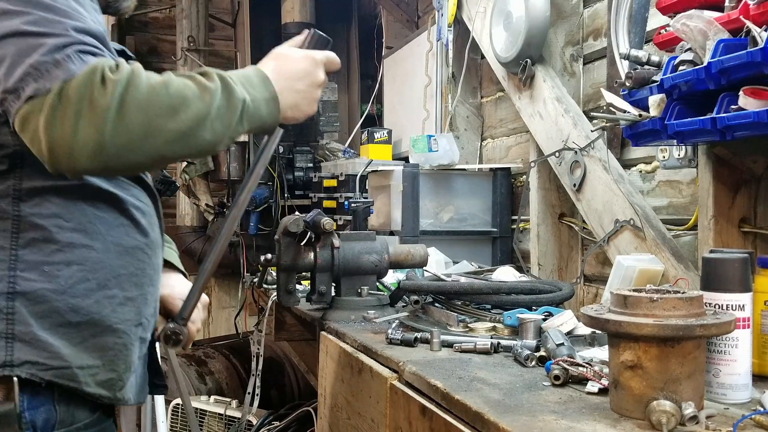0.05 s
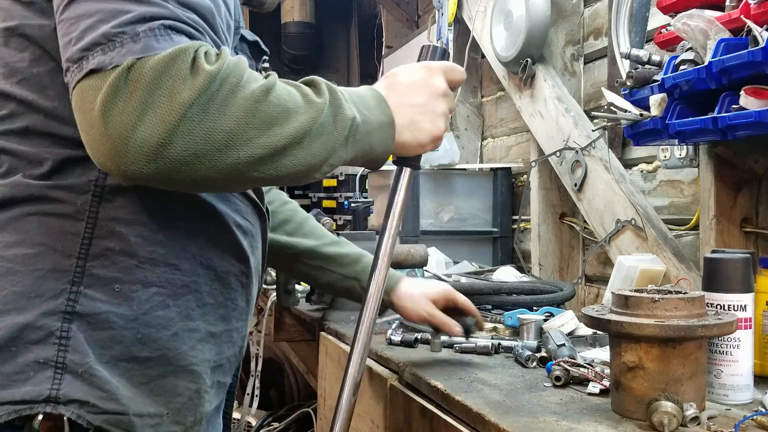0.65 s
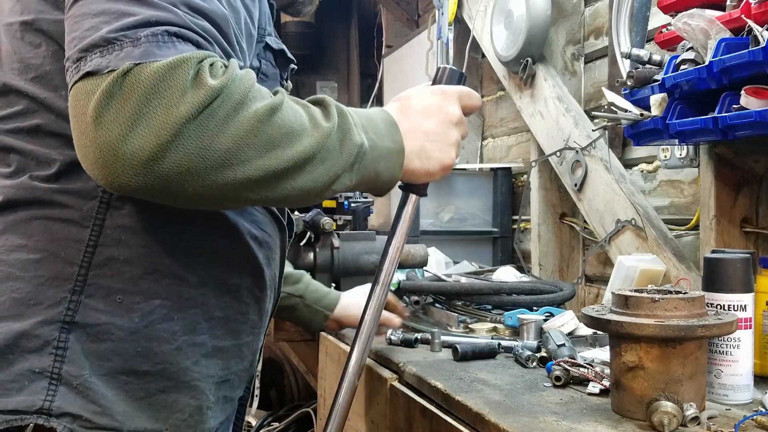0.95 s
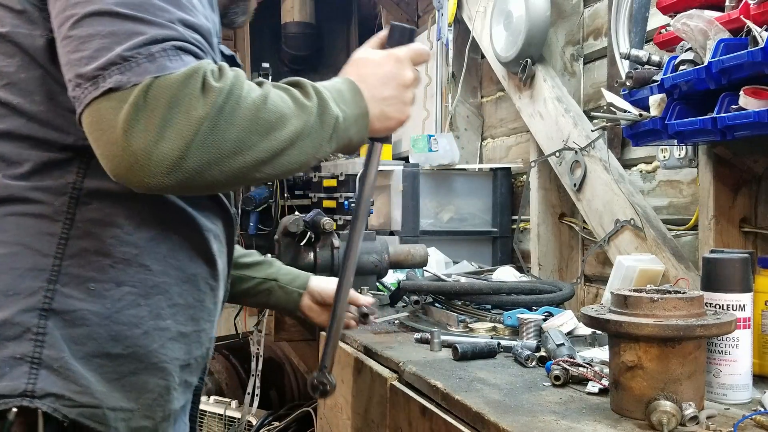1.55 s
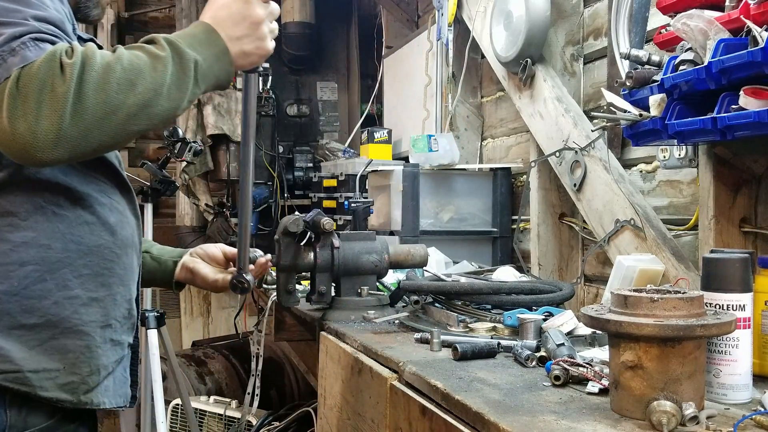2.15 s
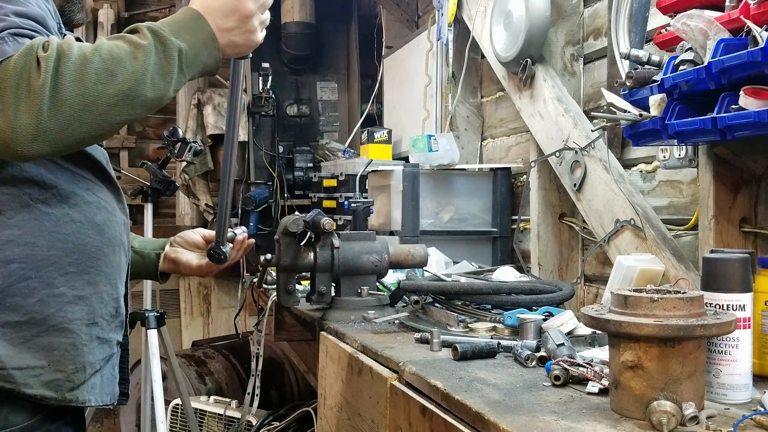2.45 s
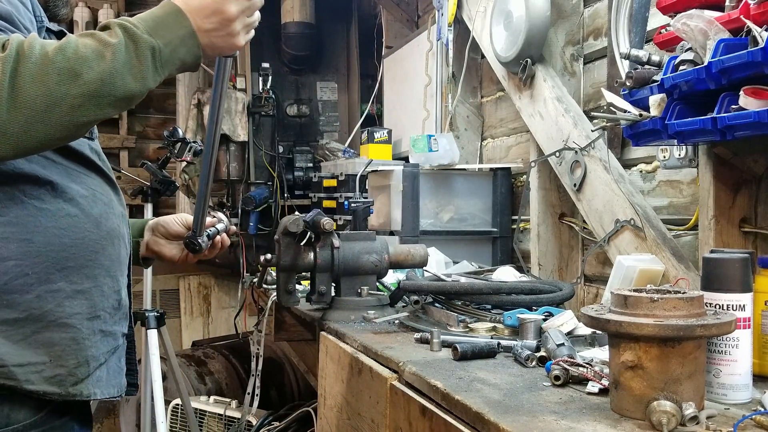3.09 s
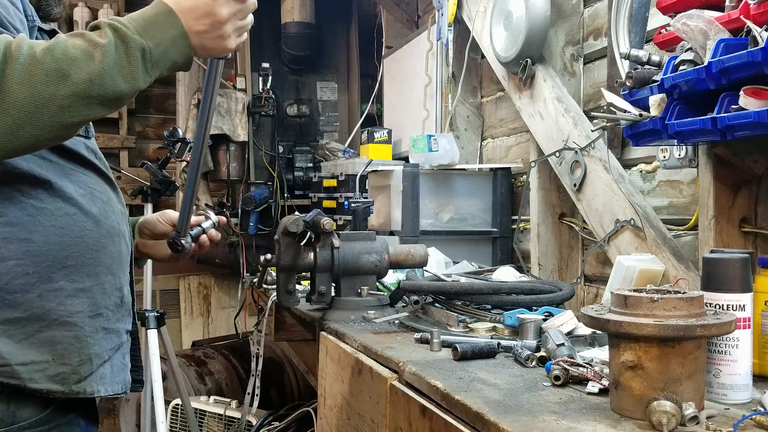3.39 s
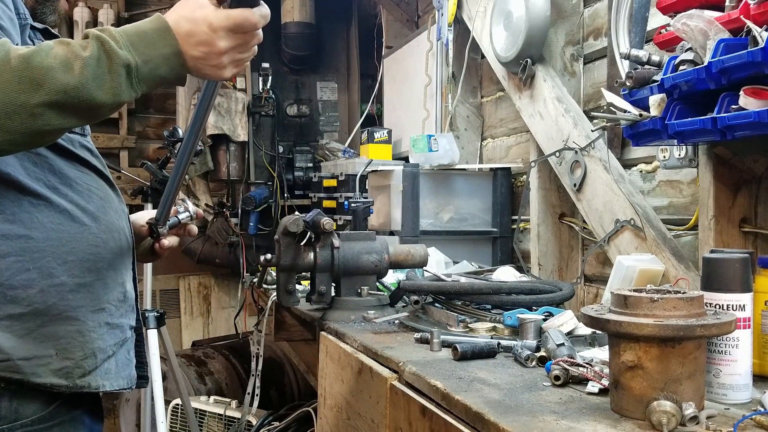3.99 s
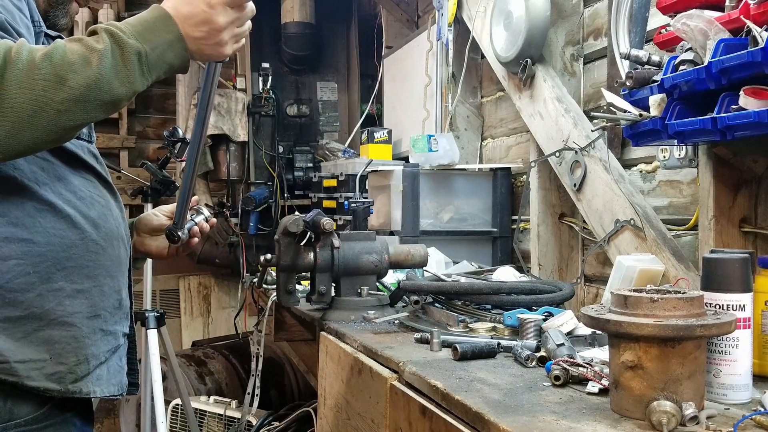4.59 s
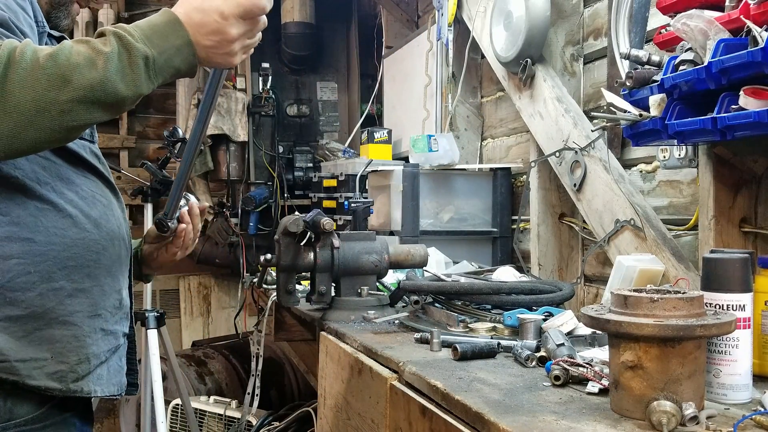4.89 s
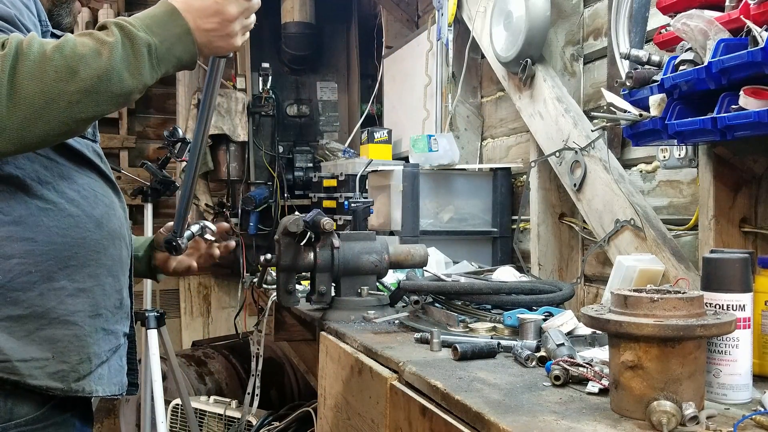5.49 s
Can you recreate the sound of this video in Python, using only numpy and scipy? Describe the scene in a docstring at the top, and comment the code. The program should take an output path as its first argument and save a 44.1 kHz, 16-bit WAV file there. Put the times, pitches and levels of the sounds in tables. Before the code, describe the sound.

A torque wrench gives a few small metallic clicks in the first quarter second, with a soft brush of sleeve. At about 0.8 seconds a heavy steel socket lands on a wooden workbench with a loud knock and rocks in a quick clatter, settling by about 1 second. Faint cloth rustle comes and goes. From 2.7 to 3.6 seconds another socket ticks and clinks lightly and irregularly against the wrench. At 4 seconds it snaps home with a sharp, loud metallic click, followed by a tiny tick. From about 5 to 5.3 seconds the ratchet is spun by hand in two quick twists, a rapid run of fine clicks with slight scraping and thin squeaks. Everything sounds close, with the short reverberation of a small workshop and a faint low hum that grows a little in the second half.

```python
"""Changing sockets on a torque wrench

In a small workshop a heavy socket lands and rocks on a wooden bench, driving bending waves in the boards.
Another ticks against the square drive and snaps home, each impact exciting the modes of the steel.
The ratchet clicks, then is spun by hand: its pawl strikes once per tooth, while friction scrapes and
squeals. A sleeve brushes past as soft noise, and a faint hum lies under the room's reverberation."""
import sys
import numpy as np
from scipy import signal
from scipy.fft import rfft, irfft
from scipy.io import wavfile
from scipy.ndimage import uniform_filter1d

SR = 44100
rng = np.random.default_rng(int(sys.argv[2]) if len(sys.argv) > 2 else 0)


def persist_wave(psi):
    """Save psi, clipped to +-1, as 16-bit WAV."""
    counts = np.round(np.clip(psi, -1, 1) * 32767).astype(np.int16)
    wavfile.write(sys.argv[1], SR, np.atleast_2d(counts).T)


N = 248846
TAPS = 4096
HZ = np.fft.rfftfreq(TAPS, 1 / SR)
TIME, AGE = np.arange(N) / SR, np.arange(SR) / SR  # seconds into the scene, and into one event

# Socket landing on the bench: start_s, level_db, high_hz, low_hz, lean_left_db, rebound_gap_s,
# change_per_rebound_db
BENCH_IMPACTS = [(.7893, 5, 13000, 520, -7.5, 0.0093, -2.5), (.7999, 12.1, 3100, 119, 0.5, .0045, -2),
                 (.842, 4, 1100, 60, -3.5, 0.01, -4), (.878, 2.5, 1400, 300, 5, .0208, -2),
                 (.9094, 5.5, 2600, 380, 6.5, .0076, -2.5)]
# Response of the boards to a blow: frequency_hz, gain_db
BENCH_SPECTRUM = [(40, -11), (90, 4.5), (150, 8), (300, -6), (450, 1), (800, 0.5), (1200, 3), (1800, -5.5),
                  (2300, -8.5), (2900, -18.5), (4500, -21), (8000, -41.5), (15000, -38)]
# Normal modes of the bench top: pitch_hz, level_db
BOARD_MODES = [(123.8, -44.5), (140.0, -45), (269.2, -46), (366.1, -44), (506.0, -32), (716.0, -42),
               (807.5, -54), (904.4, -50.5), (942.1, -49), (990.5, -41), (1034, -36), (1087, -35),
               (1168, -31), (1303, -55.5), (1373, -53), (1502, -50), (1626, -33), (1798, -33),
               (1900, -49.5), (2277, -59)]
# Socket touching steel: start_s, level_db, low_hz, high_hz, scrape_s, relative_ring_db
SOCKET_TOUCHES = [(.004, -22.5, 2500, 8800, .027, -14), (.9, -26, 2800, 4000, .001, 3),
                  (.9094, -23.5, 3000, 6500, .007, -3), (2.6632, -26, 1200, 4500, 0.0014, -14),
                  (2.8044, -26, 2800, 7500, .002, -2), (2.816, -14, 2940, 7600, 0.001, -2),
                  (2.8737, -25, 1400, 2100, 0.00085, -14), (3.1268, -18.5, 620, 6500, .0022, -26),
                  (3.308, -28, 1000, 3470, 0.0099, -18), (3.333, -27, 1200, 6500, 0.0045, -16),
                  (4.296, -32, 1800, 6940, 0.0069, -16)]
# Resonances of the socket, damped by the fingers: centre_hz, width_hz, gain_db
SOCKET_RESONANCES = [(3080, 860, 4.5), (4860, 620, 5), (6970, 1900, 2.5), (10400, 1200, 4)]
# Resonances of the wrench head: centre_hz, width_hz, gain_db
HEAD_RESONANCES = [(1950, 980, 5), (2710, 690, -4), (4680, 630, 4.5), (5900, 1600, 1.5), (9260, 490, -2.5),
                   (11400, 520, 5.5), (14200, 1200, 5)]
# Two twists of the fingers spinning the ratchet: time_s, speed_teeth_per_s, drop_level_db
RATCHET_MOTION = [(4.9957, 77, -14), (5.052, 78, -16.5), (5.085, 94, -16.5), (5.118, 87, -19),
                  (5.138, 55, -25), (5.192, 52, -25), (5.218, 77, -23), (5.243, 75, -16), (5.266, 76, -23),
                  (5.278, 26, -25), (5.305, 26, -20.5)]
# Lone clicks as the wrench is swung: start_s, level_db, low_hz, relative_ring_db, lift_level_db
SWING_CLICKS = [(.163, -19.5, 3500, -7.5, -20), (.2455, -17.5, 900, -22, -28)]
# Stick-slip of the gear in the head: middle_s, half_length_s, level_db, pitch_hz
GEAR_SQUEALS = [(5.097, .035, -58, 6140), (5.206, .03, -52, 6100), (5.262, .014, -40.5, 5950),
                (5.303, 0.0068, -46, 6050)]
# Sleeve brushing jacket and bench: middle_s, half_length_s, level_db
SLEEVE_STROKES = [(.12, 0.33, -55.5), (1.304, .07, -58.5), (1.518, 0.051, -54.5), (2.25, 0.081, -47.5),
                  (2.152, 0.4, -60), (3.401, 0.65, -62.5)]
# Friction noise of cloth: frequency_hz, relative_density_db
CLOTH_SPECTRUM = [(150, -7.5), (550, -2), (850, 0), (1550, -3), (2500, -6), (5500, -15.5), (8500, -28),
                  (15000, -19)]
# Ambient noise of the workshop: frequency_hz, relative_density_db
AIR_SPECTRUM = [(12, -31), (20, -5), (37, -1), (55, -14), (93, -4), (120, -10.5), (146, -4), (310, -13),
                (347, -9), (388, -14.5), (607, -16.5), (897, -21.5), (1060, -22.5), (1440, -22.5),
                (16000, -43.5)]
# Envelope of the lower hum: time_s, level_db
HUM_ENVELOPE = [(0, -66.5), (3.2, -71), (3.6, -57), (4.4, -59.5), (4.7, -53.5), (5.64, -53.5)]
# Left-right likeness of a diffuse field: frequency_hz, coherence_ratio
DIFFUSE_COHERENCE = [(60, .99), (250, .95), (600, .82), (1200, .65), (3000, .55), (6000, .65), (9000, .4),
                     (12000, .1)]
# Reverberation time of the workshop: frequency_hz, t60_s
ROOM_DECAY = [(100, .65), (700, .64), (1500, .56), (4000, .5), (8000, .4), (15000, .3)]


def bench_knocks():
    """Impact excitation: each blow drives the boards, which shudder and ring on in many close modes."""
    out, boards = np.zeros((2, N)), gain_of(read(BENCH_SPECTRUM, HZ))
    modes = unit(sum((-1) ** k * gain_of(db) * ring(hz, t60=.32)
                     for k, (hz, db) in enumerate(BOARD_MODES)))
    for impact in BENCH_IMPACTS:
        for s, db, high_hz, low_hz, lean_db in rebounds(*impact, count=3):
            blow = disperse(pulse(boards, low_hz, high_hz), lag_s=.00112)
            shudder = unit(through(blow, diffuse(SR) * decay(t60=.076)))
            ringing = unit(through(modes, pulse(1, low_hz, high_hz)))
            left, right = blow + gain_of(.5) * shudder + gain_of(-11) * ringing
            pan_db = lean_db - 2.5
            left_lead_s = lean_db * 2.5e-5  # the farther side hears it later
            add(out[0], s - left_lead_s, gain_of(db + pan_db / 2) * left)
            add(out[1], s, gain_of(db - pan_db / 2) * right)
    left, right = room(out, early_db=-11.5, early_t60=.039, tail_db=-8.5)
    highpass = signal.butter(1, 350, "high", fs=SR, output="sos")
    side = signal.sosfilt(highpass, left - right)  # long waves reach both sides alike
    return np.array([left + right + side, left + right - side]) / 2


def rebounds(s, db, high_hz, low_hz, lean_db, gap_s, change_db, count):
    """Inelastic collision: each rebound is sooner, weaker, duller, thinner and on the opposite edge."""
    for k in range(count):
        yield s, db + k * change_db, high_hz * .65 ** k, low_hz + k * 130, lean_db * (-1) ** k
        s += gap_s * .67 ** k


def socket_snap(stop_s=3.9993, slide_s=.008):
    """Hard impacts excite a wide band: the socket rides over the detent ball and hits its stop."""
    out = np.zeros((2, N))
    base_db = 2  # all the steel sounds, not only the socket's resonances
    slide = socket_tick(low_hz=700, high_hz=16000, scrape_s=.005, base_db=base_db)
    squeak = microslip(ring(13000, t60=.0007), scrape_s=.003, grit=2.5)
    ball_drop = socket_tick(low_hz=1800, high_hz=14000, scrape_s=.0004, base_db=base_db)
    stop = socket_tick(low_hz=1100, high_hz=12500, scrape_s=.0002, base_db=base_db)
    chatter = socket_tick(low_hz=800, high_hz=12000, scrape_s=.003, base_db=base_db)
    shaft_ring = gain_of(-7) * ring(1900, t60=.006)
    body_ring = gain_of(-6) * ring(3100, t60=.002)
    ball_ring = gain_of(2) * ring(12100, t60=.012)
    for offset_s, sound in [(-slide_s, gain_of(-6) * (slide + shaft_ring)),
                            (-.7 * slide_s, gain_of(-3.5) * squeak),
                            (-.0015, gain_of(-.5) * ball_drop + body_ring),
                            (0, gain_of(5.3) * stop),
                            (.0016, gain_of(-3) * chatter + ball_ring)]:
        add(out, stop_s + offset_s, room(sound, early_db=-7, early_t60=.07, tail_db=-12.5))
    return out


def socket_clinks():
    """Damped vibration: steel ticks on steel in the palm, each touch with its own room reflections."""
    out = np.zeros((2, N))
    for s, db, low_hz, high_hz, scrape_s, ring_db in SOCKET_TOUCHES + fumbles(count=6):
        tick = socket_tick(low_hz, high_hz, scrape_s, base_db=-3.5)
        clink = gain_of(db) * (tick + gain_of(ring_db) * ring(3124, t60=.012))
        add(out, s, room(clink, early_db=-5.5, early_t60=.075, tail_db=-18))
    return out


def fumbles(count, start_s=3.2, span_s=.4):
    """Irregular light impacts as the fingers feel for the drive, in the columns of SOCKET_TOUCHES."""
    return [(start_s + span_s * (k + when) / count, -36 + 2.5 * (2 * force - 1), 1700, 4200, .012, -4)
            for k, (when, force) in enumerate(rng.random((count, 2)))]


def socket_tick(low_hz, high_hz, scrape_s, base_db):
    """Impulse response of the socket to one touch; the longer it scrapes, the grittier it sounds."""
    click = pulse(resonances(SOCKET_RESONANCES, base_db), low_hz, high_hz)
    return microslip(disperse(click, lag_s=.000483), scrape_s, grit=840 * scrape_s)


def ratchet():
    """An impact train: the pawl drops once per tooth, so the click rate follows the turning speed."""
    out, head = np.zeros(N), resonances(HEAD_RESONANCES, base_db=-18)
    s, speed, drop_db = np.transpose(RATCHET_MOTION)
    teeth_passed = np.ceil(np.cumsum(np.interp(TIME, s, speed, left=0, right=0)) / SR)
    drop_times = np.flatnonzero(np.diff(teeth_passed)) / SR
    variations = rng.uniform(-1, 1, (len(drop_times), 2))  # no two teeth are quite alike
    for at, (force, colour) in zip(drop_times, variations):
        drop = pawl_strike(head, low_hz=1450 * 2 ** (.4 * colour), high_hz=7600,
                           ring_hz=6150, ring_db=-8)  # the head rings lower in the fingers
        add(out, at, gain_of(np.interp(at, s, drop_db) + 1.5 * force) * drop)
    out = out + swing_clicks(head, count=3) + ratchet_friction(head) + gear_squeals()
    return room(out, early_db=-6, early_t60=.09, tail_db=-13.5)


def pawl_strike(head, low_hz, high_hz, ring_hz, ring_db):
    """Free vibration: the pawl strikes once and the wrench head rings down."""
    click = disperse(pulse(head, low_hz, high_hz), lag_s=.001627)
    return microslip(click, scrape_s=.002, grit=1.7) + gain_of(ring_db) * ring(ring_hz, t60=.013)


def swing_clicks(head, count, ring_hz=6400, lift_lead_s=.008, bounce_s=.0045):
    """Contact bounce: the pawl lifts with a thin tick, drops and chatters, duller each time."""
    out = np.zeros(N)
    for s, db, low_hz, ring_db, lift_db in SWING_CLICKS:
        lift = pawl_strike(head, low_hz=7500, high_hz=16000, ring_hz=ring_hz, ring_db=ring_db)
        add(out, s - lift_lead_s, gain_of(lift_db) * lift)
        for k in range(count):
            drop = pawl_strike(head, low_hz, high_hz=11500 * .72 ** k, ring_hz=ring_hz, ring_db=ring_db)
            add(out, s + k * bounce_s, gain_of(db - 2.8 * k) * drop)
    return out


def ratchet_friction(head, usual_teeth_per_s=81, lead_s=.006):
    """Sliding friction grows louder with speed: the pawl scrapes and squeaks, and the gear drags."""
    s, speed, _ = np.transpose(RATCHET_MOTION)
    turning = (TIME > s[0] - lead_s) & (TIME < s[-1])
    elapsed_s = np.maximum(TIME - s[0], 0)
    doublings = np.log2(np.interp(TIME, s, speed) / usual_teeth_per_s)
    scrape = turning * slip_noise() * gain_of(-57 + 6 * doublings + 20 * elapsed_s)
    squeak = turning * slip_noise() * gain_of(-49.5 + 13 * doublings - 25 * elapsed_s)
    drag = turning * slip_noise() * gain_of(-52 + 6 * doublings)
    return (through(scrape, pulse(1, low_hz=9050, high_hz=16000))
            + through(squeak, ring(11530, t60=.0054))
            + through(drag, pulse(head, low_hz=1500, high_hz=9000)))


def gear_squeals(sag_hz=119.4):
    """Stick-slip: the gear excites the head's ring in short, rough squeals that sink in pitch."""
    out = np.zeros(N)
    roughness = through(slip_noise(), unit(decay(t60=.0085)))[0]
    for middle_s, half_length_s, db, hz in GEAR_SQUEALS:
        pitch_hz = hz - sag_hz * np.clip((TIME - middle_s) / half_length_s, -2, 2)
        tone = np.sqrt(2) * np.sin(2 * np.pi * np.cumsum(pitch_hz) / SR)
        out += gain_of(db) * swell(middle_s, half_length_s) * roughness * tone
    return out


def sleeve(rustle_db=-69, unevenness_db=1.2):
    """Incoherent sources add in power: soft strokes of sliding cloth rise over a faint rustle."""
    flutter = unit(uniform_filter1d(rng.standard_normal(N), size=400)) * np.sqrt(N)
    power = gain_of(rustle_db) ** 2 + sum((gain_of(db) * swell(middle_s, half_length_s)) ** 2
                                          for middle_s, half_length_s, db in SLEEVE_STROKES)
    return diffuse(N, CLOTH_SPECTRUM) * np.sqrt(power) * gain_of(unevenness_db * flutter)


def background():
    """Superposition of steady air noise and two low hums, the lower of which swells."""
    air = gain_of(-52.5) * diffuse(N, AIR_SPECTRUM)
    hum_gain = gain_of(np.interp(TIME, *np.transpose(HUM_ENVELOPE)))
    return air + hum_gain * hum(91.3, waver=1) + gain_of(-66.5) * hum(152, waver=5)


def hum(hz, waver):
    """Phase diffusion: a tone of rms 1 wavers as its phase takes a random walk."""
    drift = waver * np.cumsum(rng.standard_normal(N)) / np.sqrt(SR)
    return np.sqrt(2) * np.sin(2 * np.pi * hz * TIME + drift)


def room(x, early_db, early_t60, tail_db):
    """Reverberation: direct sound, scatter from bench and shelves, and a tail whose treble dies first."""
    hz, t, spectra = signal.stft(diffuse(SR), SR, nperseg=256)
    absorption = gain_of(-60 * t / read(ROOM_DECAY, hz)[:, None])
    tail = signal.istft(spectra * absorption, SR, nperseg=256)[1][:, :SR]
    tail = unit(tail * np.minimum(AGE / .031, 1))
    early = unit(diffuse(SR) * decay(early_t60) * (AGE > .0015))
    return x + through(x, gain_of(early_db) * early + gain_of(tail_db) * tail)


def diffuse(size, spectrum=((1, 0), (2, 0))):
    """A diffuse field: coloured noise of rms 1 at two points, coherent at long wavelengths."""
    hz = np.fft.rfftfreq(size, 1 / SR)
    mid, side = rfft(rng.standard_normal((2, size))) * gain_of(read(spectrum, hz))
    coherence = np.clip(read(DIFFUSE_COHERENCE, hz), 0, 1)
    mid, side = mid * np.sqrt(1 + coherence), side * np.sqrt(1 - coherence)
    return unit(irfft([mid + side, mid - side], size)) * np.sqrt(size)


def pulse(gain, low_hz, high_hz):
    """Minimum phase: the causal click with this spectrum between two soft band edges."""
    gain = gain / np.sqrt((1 + (low_hz / (HZ + 1)) ** 4) * (1 + (HZ / high_hz) ** 6))
    log_gain = np.log(np.maximum(gain, 1e-5))
    log_spectrum = np.conj(signal.hilbert(np.r_[log_gain, log_gain[-2:0:-1]]))
    click = np.fft.ifft(np.exp(log_spectrum)).real
    return unit(np.pad(click[:TAPS // 2], (0, SR - TAPS // 2)))


def disperse(click, lag_s):
    """Dispersion of bending waves: 1 kHz arrives lag_s late, the treble sooner, the bass later."""
    hz = np.fft.rfftfreq(SR, 1 / SR)
    return irfft(rfft(click) * np.exp(-4j * np.pi * lag_s * np.sqrt(1000 * hz)), SR)


def microslip(click, scrape_s, grit):
    """Microslip: as steel seats on steel, a dying burst of tiny slips follows the click."""
    slips = unit(rng.standard_normal(SR) * np.exp(-AGE / scrape_s))
    return unit(click + grit * through(click, slips)[0])


def slip_noise(slips_per_s=6000):
    """Shot noise of rms 1 from dense, tiny slips of steel over steel."""
    return unit(rng.standard_normal(N) * (rng.random(N) < slips_per_s / SR)) * np.sqrt(N)


def resonances(peaks, base_db):
    """Gain of broad resonances that add in power on a flat base."""
    power = sum(gain_of(db) ** 2 / (1 + (2 * (HZ - hz) / width) ** 2) for hz, width, db in peaks)
    return np.sqrt(gain_of(base_db) ** 2 + power)


def ring(hz, t60):
    """A damped harmonic oscillation of energy 1."""
    return unit(np.sin(2 * np.pi * hz * AGE) * decay(t60))


def decay(t60):
    """Exponential decay by 60 dB in t60 seconds."""
    return np.exp(-np.log(1000) * AGE / t60)


def swell(middle_s, half_length_s):
    """A Gaussian envelope of height 1."""
    return np.exp(-((TIME - middle_s) / half_length_s) ** 2)


def gain_of(db):
    """Amplitude ratio of a level in decibels."""
    return 10 ** (np.asarray(db) / 20)


def unit(x):
    """Normalisation to a mean energy of 1 per channel."""
    return x / np.sqrt(np.mean(np.sum(x ** 2, -1)) + 1e-20)


def read(points, hz):
    """Interpolation on a log-frequency axis."""
    frequency, value = np.transpose(points)
    return np.interp(np.log(hz + 1), np.log(frequency + 1), value)


def add(mix, s, sound):
    """Superposition of a sound on the mix at time s."""
    part = mix[..., round(s * SR):][..., :sound.shape[-1]]
    part += sound[..., :part.shape[-1]]


def through(x, response):
    """Convolution with an impulse response, keeping the length of x."""
    return signal.fftconvolve(np.atleast_2d(x), np.atleast_2d(response), axes=1)[:, :x.shape[-1]]


def scene():
    """Linear superposition of all sources at the two microphones."""
    return bench_knocks() + socket_clinks() + socket_snap() + ratchet() + sleeve() + background()


def record(dry):
    """Diffraction round a case: top treble is stronger left, weaker and late right; then a low-pass."""
    hz = np.fft.rfftfreq(N, 1 / SR)
    shadow = np.clip((hz - 9000) / 3000, 0, 1)
    delay = np.exp(-2j * np.pi * .00059 * np.maximum(hz - 10200, 0))
    response = np.array([gain_of(2.7 * shadow), gain_of(-1.1 * shadow) * delay])
    heard = irfft(rfft(dry) * response, N)
    lowpass = signal.firwin(401, 15850, window=("kaiser", 9), fs=SR)
    return signal.oaconvolve(heard, lowpass[None], "same")


dry = scene()
out = record(dry)
persist_wave(out)
```